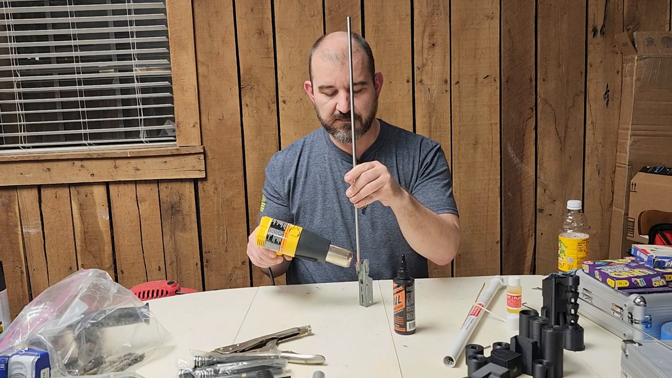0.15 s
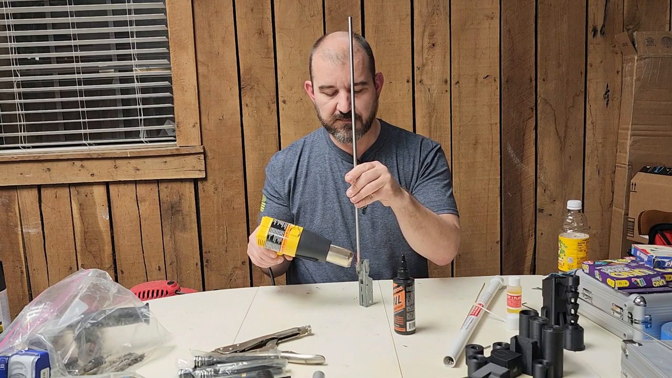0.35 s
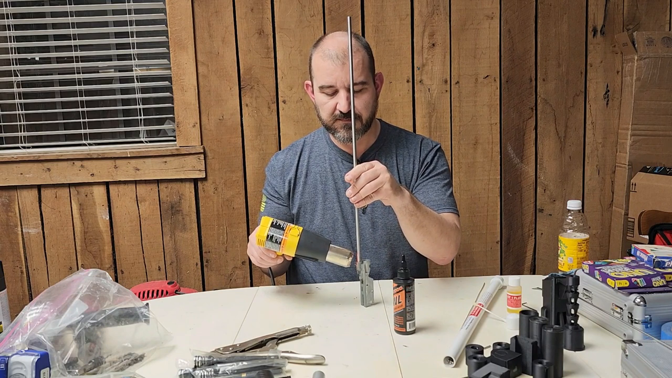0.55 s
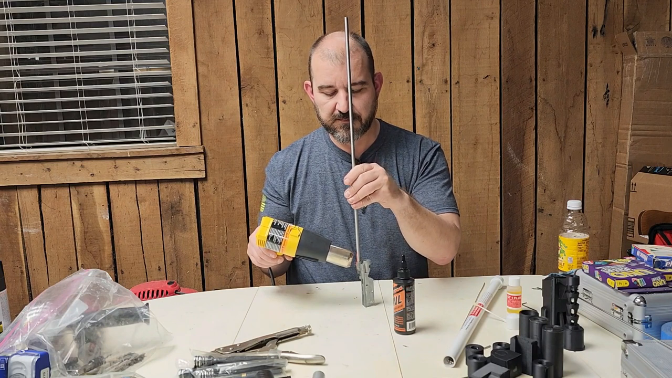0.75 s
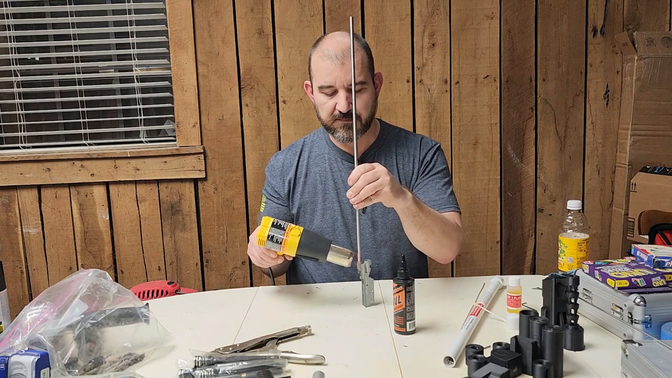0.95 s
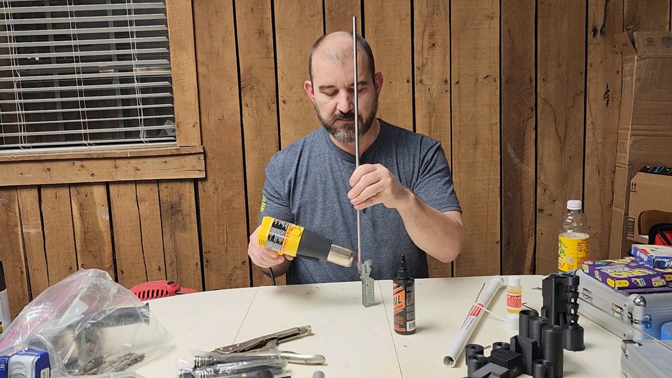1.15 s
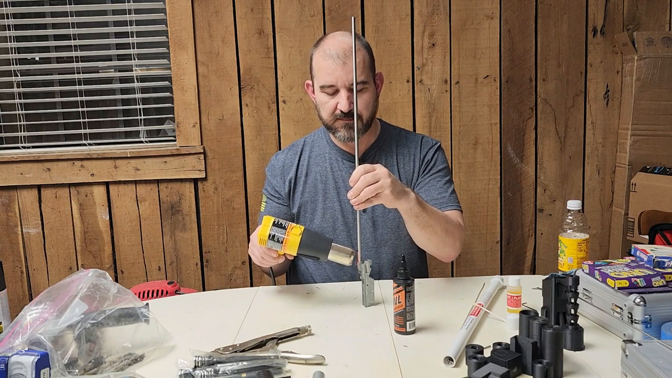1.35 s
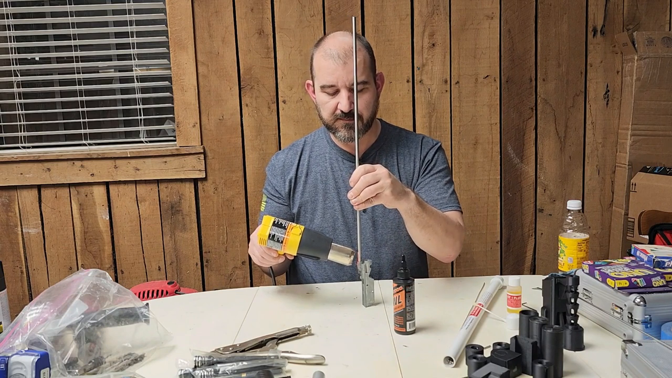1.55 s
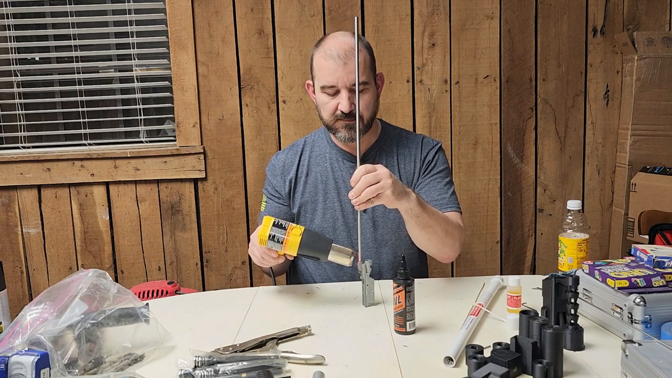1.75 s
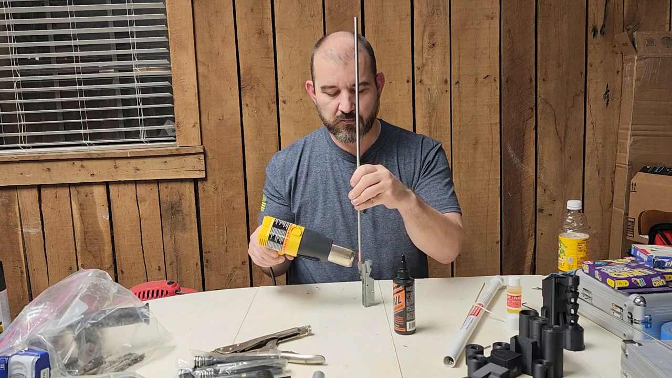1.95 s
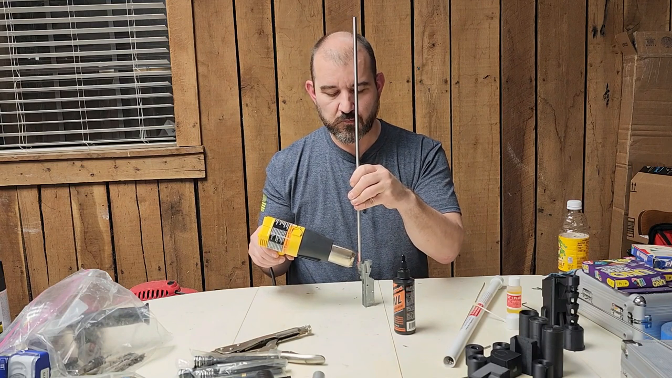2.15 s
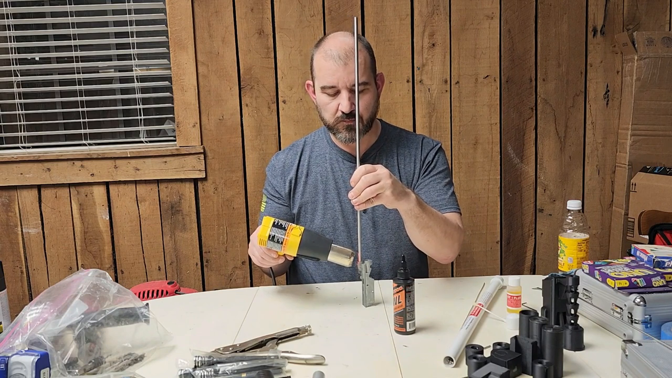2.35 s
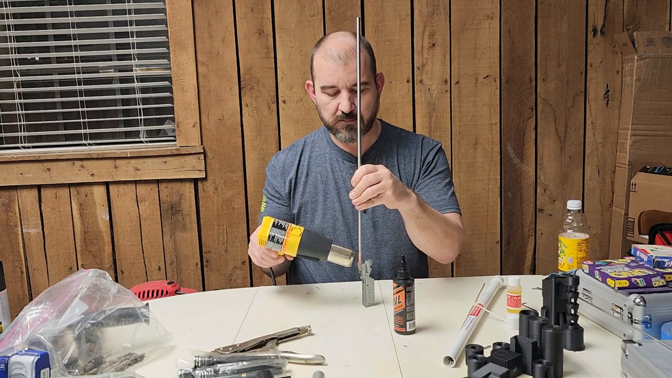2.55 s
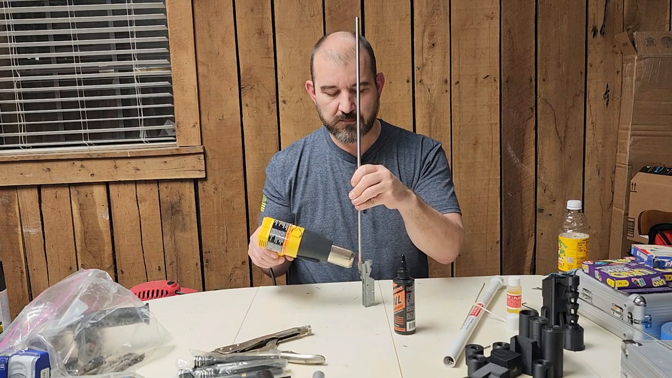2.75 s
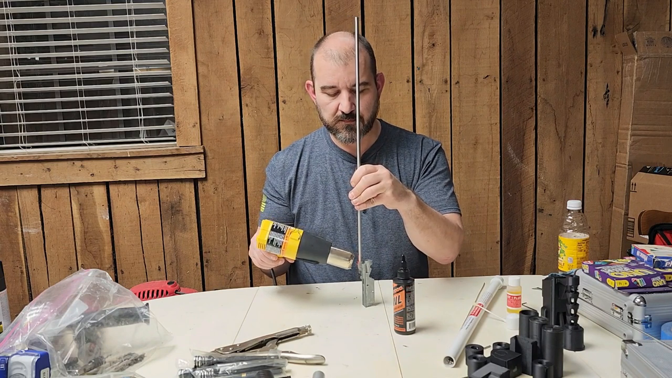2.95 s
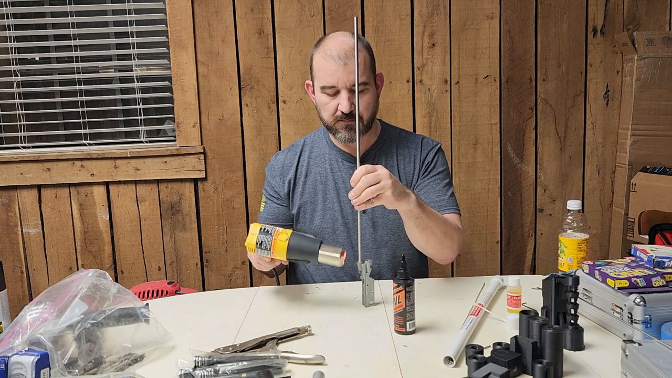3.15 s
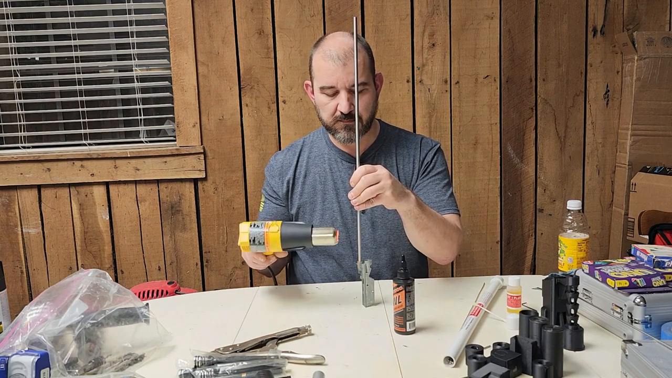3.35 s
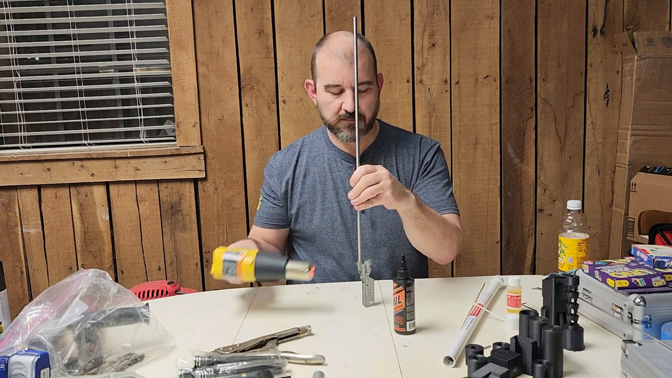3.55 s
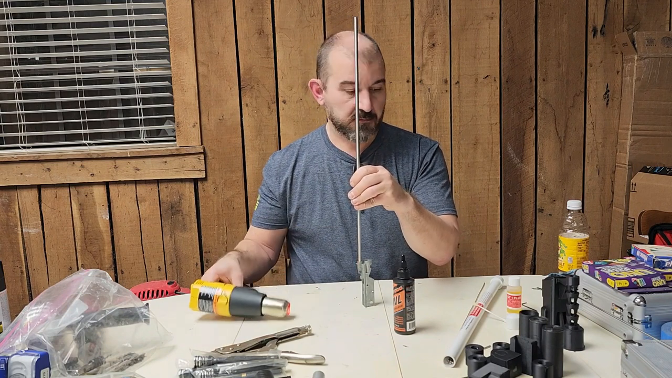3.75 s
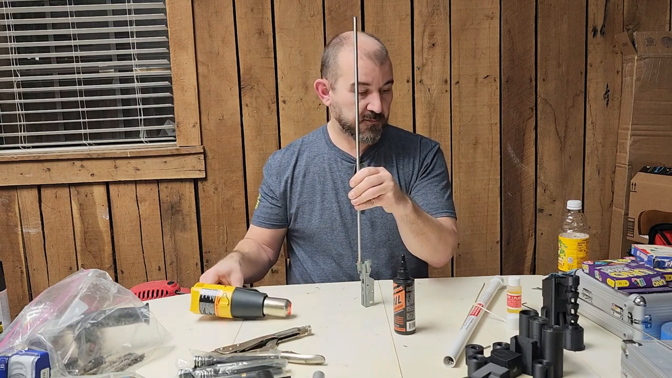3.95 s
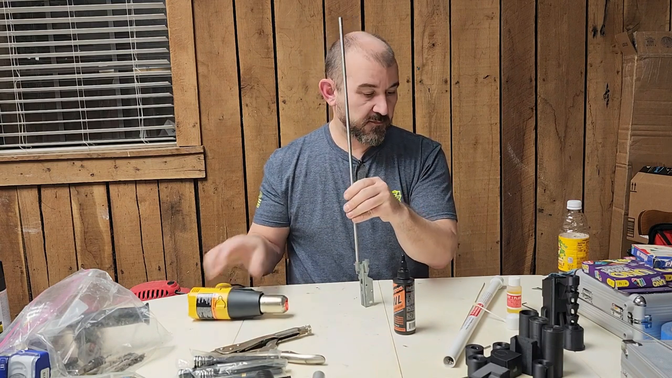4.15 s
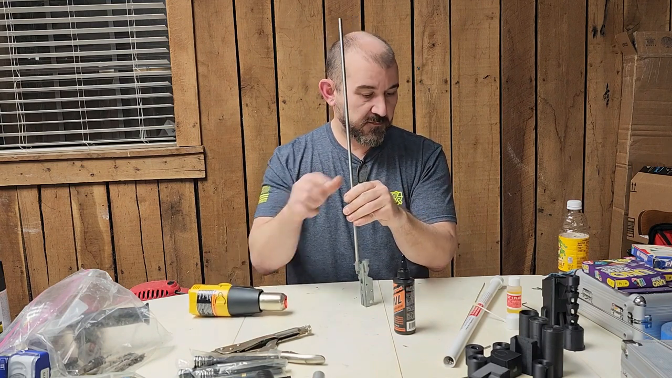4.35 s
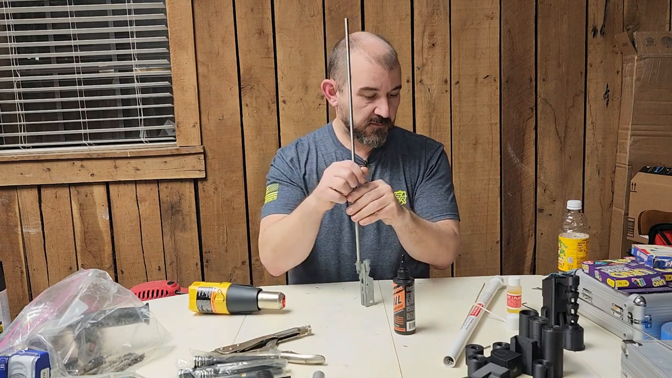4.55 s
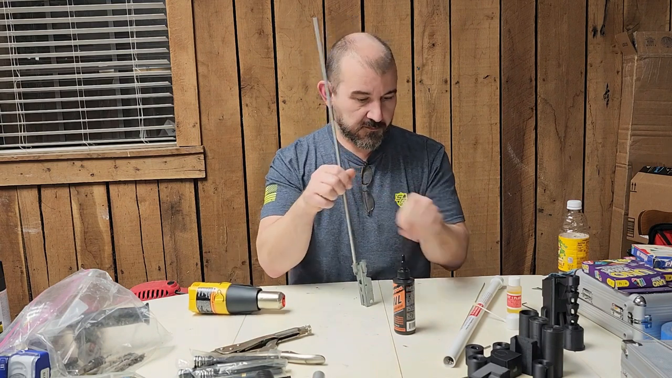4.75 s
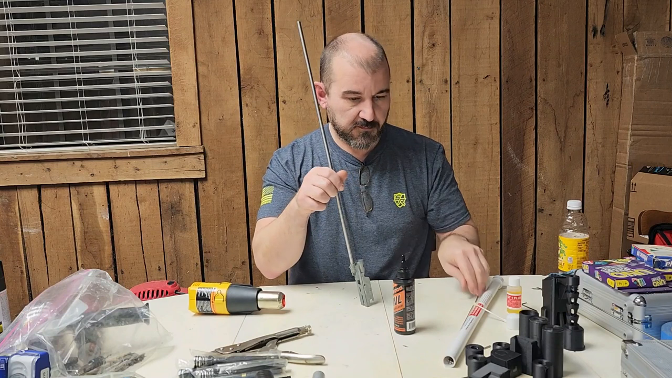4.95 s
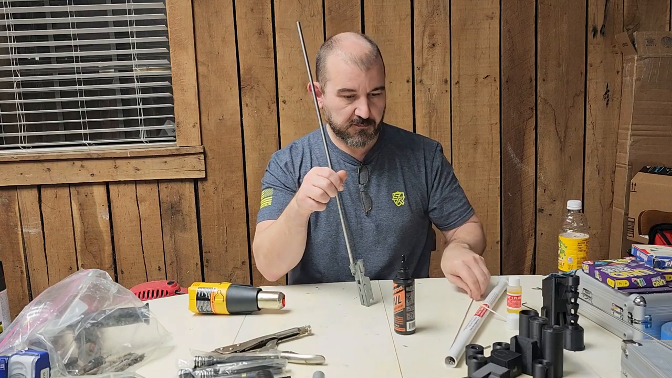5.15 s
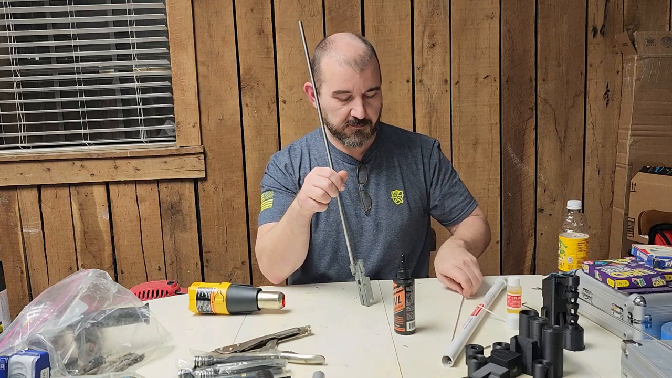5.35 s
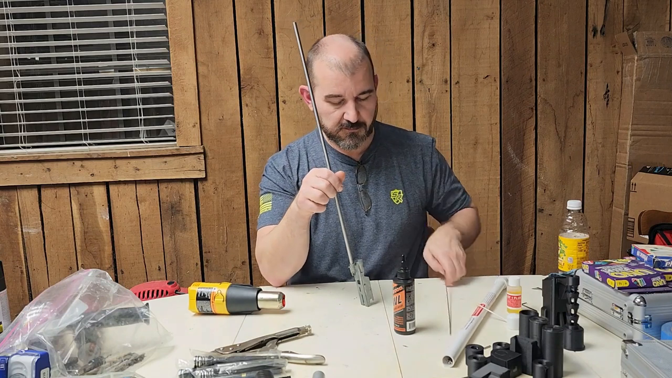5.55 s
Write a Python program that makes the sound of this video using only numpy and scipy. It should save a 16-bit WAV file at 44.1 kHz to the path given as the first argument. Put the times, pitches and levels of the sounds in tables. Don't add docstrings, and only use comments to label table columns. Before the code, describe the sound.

In a small wood-panelled room, a heat gun blows steadily, its whining motor mixed with rushing air. After about three seconds a switch snaps, the whine dies almost at once and the air fades. The gun hits a plastic table with two loud hollow knocks, rocks and settles, then hands rub and rustle softly over a low appliance hum. Stereo microphone, fairly close, with a short room ring.

```python
import sys
import numpy as np
from scipy import signal
from scipy.fft import rfft, irfft, next_fast_len
from scipy.io import wavfile

SR = 44100
rng = np.random.default_rng(int(sys.argv[2]) if len(sys.argv) > 2 else 0)


def to_linear_factor(level_db):
    exponent = np.asarray(level_db, float) / 20
    return 10 ** exponent


def wav_out(sig):
    wavfile.write(sys.argv[1], SR, np.round(np.clip(np.atleast_2d(sig).T, -1, 1) * 32767).astype(np.int16))


N = 247401
T = np.arange(N) / SR


def rms_one(x):
    return x / np.sqrt(np.mean(x ** 2) + 1e-20)


def at_hz(points, hz):
    table_hz, value = np.array(points)[:, 0], np.array(points)[:, 1]
    return np.interp(np.log(hz + 1), np.log(table_hz), value)


def drift(rate_hz):
    return np.interp(T * min(rate_hz, 70), np.arange(400), rng.standard_normal(400))


def stereo_noise(spectrum, likeness, size=N):
    pad = next_fast_len(size)
    hz = np.arange(pad // 2 + 1) * SR / pad
    mid, side = rfft(rng.standard_normal((2, pad)))
    alike = np.clip(at_hz(likeness, hz), -1, 1)
    pair = np.sqrt(1 + alike) * mid + np.sqrt(1 - alike) * side * [[1], [-1]]
    return rms_one(irfft(pair * to_linear_factor(at_hz(spectrum, hz)), pad)[:, :size])


def ring(push, hz, t60):
    radius = to_linear_factor(-60 / (t60 * SR))
    angle = 2 * np.pi * hz / SR
    return signal.lfilter([0, np.sin(angle)], [1, -2 * radius * np.cos(angle), radius * radius], push)


def add(track, s, sound):
    i = round(s * SR)
    track[i:i + len(sound)] += sound[:N - i]


# (frequency [Hz], likeness [-1 to 1])
DIRECT_LIKENESS = [(60, 0.82), (130, 0.87), (290, 1), (640, 0.93), (1410, 0.33), (3100, 0.54),
                   (6820, -0.21), (15000, -0.2)]


def shaft_tone(phase_turns, hz, level_db):
    apart = np.arccos(np.clip(at_hz(DIRECT_LIKENESS, hz), -.3, 1)) / 2
    angle = 2 * np.pi * (phase_turns + rng.random())
    pair = np.sin(angle + apart * np.array([[1], [-1]])) / np.cos(apart)
    return np.sqrt(2) * to_linear_factor(level_db + 1.0 * drift(15)) * pair


# (multiple of turn rate [-], level [dB])
SHAFT_ORDERS = [(1, -45), (2, -46), (4, -64), (6, -51), (7, -53), (8, -53), (9, -58), (10, -53), (13, -61),
                (14, -65), (15, -64), (17, -59), (18, -61), (19, -68), (20, -62), (21, -65), (22, -63),
                (23, -71), (24, -63)]
# (multiple of turn rate [-], shift [ripples], level [dB])
RIPPLE_TONES = [(6, 1, -59), (10, -1, -65), (11, -1, -56), (17, -1, -62), (20, 1, -69), (30, 1, -70),
                (33, 1, -72)]
# (multiple of turn rate [-], level at the work [dB], level swung away [dB], wander [dB])
BEAMED_TONES = [(3, -45, -64, 1), (11, -47, -57, 1), (12, -63, -47, 4), (16, -61, -51, 3)]
# (time [s], turn rate [Hz])
SHAFT_SPEED = [(0, 235.3), (2.1, 235.3), (2.45, 235.6), (2.85, 236.0), (3.27, 235.6)]


def motor():
    wander_db, ripple_hz = 1.7, 120
    off_s, coast_s, tone_fade_s = 3.262, .7, .05
    after = np.maximum(T - off_s, 0)
    speed = np.interp(T, *np.transpose(SHAFT_SPEED)) + 0.298 * drift(8.6)
    turns = np.cumsum(speed * np.exp(-after / coast_s)) / SR

    swing_out = (T - 2.92) / 0.29
    swing_back = 1 - (T - 3.225) / 0.051
    swing = np.clip(np.minimum(swing_out, swing_back), 0, 1)
    out = np.zeros((2, N))
    for multiple, work_db, away_db, own_db in BEAMED_TONES:
        level_db = work_db + swing * (away_db - work_db) + (1 - swing) * own_db * drift(4.0)
        out += shaft_tone(multiple * turns, 235 * multiple, level_db)

    plain = [(k, 0, level_db) for k, level_db in SHAFT_ORDERS]
    upper = [(k, 0, -70 - .4 * (k - 25)) for k in range(25, 37)]
    for multiple, shift, level_db in plain + upper + RIPPLE_TONES:
        phase = multiple * turns + shift * ripple_hz * T
        out += shaft_tone(phase, 235 * multiple, level_db + wander_db * drift(2.8))
    return out * np.exp(-after / tone_fade_s)


# (frequency [Hz], level [dB per Hz])
AIR_COLOUR = [(120, -28), (250, -15.5), (400, -11), (600, -1.5), (880, -5), (1080, -9), (1400, -4.5),
              (1900, -9.5), (2250, -10), (2600, -8.5), (3000, -13.5), (4000, -14), (5000, -20.5),
              (16000, -27.5)]


def air():
    stream_db, treble_db = -37, 3
    stall_s, stall_db, stall_time_s = 3.36, -7, 0.046
    rundown_db_per_s, dulling_db, stop_s = 27.5, -8, 3.75
    after = np.maximum(T - stall_s, 0)
    stalled = 1 - np.exp(-after / stall_time_s)
    level_db = stream_db + stall_db * stalled - rundown_db_per_s * after
    level_db = level_db - 90 * np.maximum(T - stop_s, 0)
    noise = stereo_noise(AIR_COLOUR, DIRECT_LIKENESS)
    bass = signal.sosfiltfilt(signal.butter(2, 4500, fs=SR, output="sos"), noise)
    treble = to_linear_factor(treble_db + dulling_db * stalled) * (noise - bass)
    return to_linear_factor(level_db + 1.0 * drift(7.85)) * (bass + treble)


# (left delay [s], right delay [s], level [dB])
NEAR_ECHOES = [(.0021, .0024, -12), (.0047, .0043, -11), (.0083, .0089, -11), (.0131, .0122, -12)]


def near_echoes(x):
    out = x.copy()
    dull = signal.sosfilt(signal.butter(1, 5000, fs=SR, output="sos"), x)
    for *lags_s, level_db in NEAR_ECHOES:
        for side, lag_s in enumerate(lags_s):
            lag = round(lag_s * SR)
            out[side, lag:] += to_linear_factor(level_db) * dull[side, :-lag]
    return out


def plastic_snaps(rows, t60):
    out, t = np.zeros(N), np.arange(2000) / SR
    for s, peak_db, hz in rows:
        burst = rng.standard_normal(2000) * to_linear_factor(-60 * t / t60)
        edges_hz = [hz / 6.1, min(hz * 1.1, .45 * SR)]
        snap = signal.sosfilt(signal.butter(1, edges_hz, "band", fs=SR, output="sos"), burst)
        add(out, s, to_linear_factor(peak_db) * snap / np.max(np.abs(snap)))
    return out


# (time [s], peak level [dB], top frequency of the band [Hz])
SWITCH_SNAPS = [(3.2064, -35, 11000), (3.222, -42, 9200), (3.243, -45, 8700), (3.259, -22, 9100),
                (3.272, -40, 11600), (3.333, -30, 11000), (3.3436, -25, 7000)]


def switch():
    return plastic_snaps(SWITCH_SNAPS, t60=.015)


# (time [s], peak level [dB], nose 0 to handle 1 [-], contact cut-
# off [Hz])
CONTACTS = [(3.259, -33, 0.38, 3000), (3.342, -34, 0.22, 2390), (3.62, -27, 0.65, 1700),
            (3.628, -32, 0.39, 1716), (3.809, -5, 0.36, 2750), (3.817, -40.5, 0.81, 302),
            (3.865, -25, 0.28, 1494), (3.9588, -3.5, 0.99, 3050), (3.9619, -5.5, 0.95, 2540),
            (4.013, -23, 0.97, 795), (4.07, -18, 0.33, 399), (4.117, -22.5, 0.52, 600),
            (4.134, -37, 0, 600), (4.175, -26.5, 0.89, 625), (4.206, -43, 0.85, 1800),
            (4.222, -35, 0.19, 547), (4.355, -32.5, 0.4, 505), (4.403, -35, 0.64, 497),
            (4.498, -29, 0.14, 550), (4.52, -35, 0, 600), (5.052, -40, 0.83, 800), (5.152, -40, 0.75, 1990),
            (5.39, -44.5, 0.075, 1500)]
# (frequency [Hz], nose level [dB], handle level [dB], t60 [s])
BODY_MODES = [(139.8, -2, -17, 0.13), (204, -11, -12.5, 0.072), (310.6, -10, -11, 0.082),
              (362, -5.5, -5.5, 0.049), (448, -7.5, -2.5, 0.033), (600, -4, -5.5, 0.051),
              (766, -7.5, -1, 0.019), (880, -11, -7.5, 0.049), (1090, -25, -8, 0.036),
              (1378, 2, -7.5, 0.036), (1596, -3, 0.5, 0.026), (1890, -17.5, -5, 0.037),
              (2150, -28.5, -22, 0.028), (2920, -26.5, -25.5, 0.01)]
# (frequency [Hz], level [dB per Hz])
CRACK_COLOUR = [(300, -13), (1000, 11), (2000, 7.5), (3500, -2), (5000, -9.5), (8000, -13), (16000, -22.5)]


def knocks():
    out, t = np.zeros(N), np.arange(9000) / SR
    for s, peak_db, end, cut_hz in CONTACTS:
        scuff = rng.standard_normal(9000) * np.exp(-t * cut_hz / 5.7)
        scuff = 0.065 * min(1500 / cut_hz, 1.4) * scuff
        push = signal.sosfilt(signal.butter(3, cut_hz * 1.36, fs=SR, output="sos"), (t == 0) + scuff)
        chance_db = rng.normal(0, 1.0, len(BODY_MODES))
        body = np.zeros(9000)
        for k, (hz, nose_db, handle_db, t60) in enumerate(BODY_MODES):
            level_db = nose_db + end * (handle_db - nose_db) + chance_db[k]
            body += (-1) ** k * to_linear_factor(level_db) * ring(push, hz, t60)
        dying = to_linear_factor(-60 * t / 0.043) + to_linear_factor(-6.5 - 60 * t / 0.21)
        crack = stereo_noise(CRACK_COLOUR, DIRECT_LIKENESS, size=9000)[0] * dying
        crack = to_linear_factor(-19) * crack * (cut_hz / 2500) ** 2
        add(out, s, to_linear_factor(peak_db) * (body / np.max(np.abs(body)) + crack))
    return out


# (time [s], peak level [dB], top frequency of the band [Hz])
SETTLING_TICKS = [(4.3094, -53, 7760), (4.359, -53.5, 7700), (4.496, -48.5, 5170), (5.0875, -59, 5560)]


def ticks():
    return plastic_snaps(SETTLING_TICKS, t60=0.028)


def strokes(rows, rest_db):
    power = np.full(N, to_linear_factor(rest_db) ** 2)
    for s, rise_s, peak_db in rows:
        age = np.maximum(T - s, 0) / max(rise_s, .005)
        power += (to_linear_factor(peak_db) * age ** 1.27 * np.exp(1.48 * (1 - age))) ** 2
    return np.sqrt(power)


# (frequency [Hz], likeness [-1 to 1])
SCATTERED_LIKENESS = [(60, 1), (130, 0.83), (290, 0.76), (640, 0.27), (1410, -0.43), (3100, 0.14),
                      (6820, 0.29), (15000, 0.34)]
# (start [s], rise [s], peak level [dB])
RUB_STROKES = [(3.42, 0.088, -58), (3.6, 0.03, -42), (3.85, 0.14, -45.5), (4.04, 0.045, -40),
               (4.24, 0.063, -54), (4.36, 0.085, -56.5), (4.46, 0.047, -58), (4.64, 0.05, -62),
               (5.0, .05, -65), (5.145, 0.039, -45), (5.37, 0.051, -53.5), (5.5, 0.087, -58)]
# (start [s], rise [s], peak level [dB])
RUSTLE_STROKES = [(3.85, .1, -66), (4.03, 0.088, -63), (4.28, 0.05, -78), (4.34, .03, -67),
                  (4.47, .03, -78), (4.6, .05, -80), (5.06, 0.034, -63), (5.16, 0.028, -73),
                  (5.32, 0.027, -75), (5.5, 0.067, -86)]
# (start [s], rise [s], peak level [dB])
ROD_STROKES = [(3.4, 0.085, -66.5), (3.7, 0.16, -70), (4.04, 0.07, -67), (4.24, 0.075, -73),
               (4.4, .04, -75), (4.6, 0.032, -78), (5.05, .06, -78.5), (5.32, 0.036, -85),
               (5.5, 0.069, -79)]
# (frequency [Hz], level [dB per Hz])
RUB_COLOUR = [(300, -15), (600, -4.5), (1300, -1), (2500, -12.5), (4000, -19), (6500, -28), (9000, -33.5),
              (12000, -48.5)]
# (frequency [Hz], level [dB per Hz])
RUSTLE_COLOUR = [(3000, -34), (5000, -8.5), (8000, -6.5), (12000, -6.5), (16000, -5.5)]
# (frequency [Hz], width [Hz], level [dB])
ROD_MODES = [(1170, 40, -6.5), (3180, 60, 1), (5160, 100, -8), (6500, 100, -15.5), (7250, 120, -6),
             (7400, 120, -7.5), (7700, 250, 0), (11400, 300, -11.5)]


def hands():
    rub = strokes(RUB_STROKES, rest_db=-64.5) * to_linear_factor(2.0 * drift(30))
    rub = rub * stereo_noise(RUB_COLOUR, SCATTERED_LIKENESS)
    rustle = strokes(RUSTLE_STROKES, rest_db=-105) * to_linear_factor(2.1 * drift(60))
    rustle = rustle * stereo_noise(RUSTLE_COLOUR, SCATTERED_LIKENESS)
    squeak = np.zeros((2, N))
    for hz, width_hz, level_db in ROD_MODES:
        ringing = rms_one(ring(rng.standard_normal((2, N)), hz, 2.6 / width_hz))
        squeak += to_linear_factor(level_db + 2.6 * drift(14)) * ringing
    return rub + rustle + strokes(ROD_STROKES, rest_db=-94.5) * squeak


# (frequency [Hz], t60 [s])
ROOM_DECAY = [(150, 0.36), (600, 0.24), (2500, 0.23), (9000, 0.21)]


def room(x):
    size = SR // 2
    t, tail = np.arange(size) / SR, np.zeros((2, size))
    noise = stereo_noise([(20, 0), (20000, 0)], SCATTERED_LIKENESS, size=size)
    for hz in 90 * 2. ** np.arange(8):
        edges_hz = [hz / 2 ** .5, hz * 2 ** .5]
        band = signal.sosfilt(signal.butter(2, edges_hz, "band", fs=SR, output="sos"), noise)
        tail += band * to_linear_factor(-60 * t / at_hz(ROOM_DECAY, hz))
    tail = tail * np.clip((t - .003) / 0.0038, 0, 1)
    tail = tail / np.sqrt(np.sum(tail ** 2) / 2)
    return signal.fftconvolve(x[None], tail, axes=1)[:, :N]


# (frequency [Hz], level [dB])
HUM_TONES = [(120, -37), (148.6, -59), (181, -60.5), (240, -54.5), (268.6, -57.5), (360, -54.5),
             (600, -68.5)]
# (frequency [Hz], level [dB per Hz])
RUMBLE_COLOUR = [(20, -33.5), (35, -10.5), (55, -3), (100, 5), (135, 1), (200, -0.5), (280, -6.5),
                 (400, -17), (520, -17.5), (1000, -26), (2200, -30), (4000, -55.5), (8000, -61.5),
                 (16000, -59)]


def hum():
    tones = np.zeros(N)
    for hz, level_db in HUM_TONES:
        sine = np.sin(2 * np.pi * (hz * T + rng.random()))
        tones += np.sqrt(2) * to_linear_factor(level_db + 0.29 * drift(1.6)) * sine
    return tones + to_linear_factor(-41.5) * stereo_noise(RUMBLE_COLOUR, SCATTERED_LIKENESS)


def scene():
    tones, stream = motor(), air()
    hits = switch() + knocks() + ticks()
    spread = signal.sosfilt(signal.butter(1, 3000, fs=SR, output="sos"), stream[0])
    walls = room(to_linear_factor(-4.0) * hits + to_linear_factor(-9.5) * spread)
    return tones + to_linear_factor(-1.5) * near_echoes(stream) + hits + walls + hands() + hum()


def band_limit(x):
    return signal.sosfilt(signal.butter(12, 16460, fs=SR, output="sos"), x)


# (frequency [Hz], difference [dB])
PORT_DIFFERENCE = [(60, 1), (110, 1), (200, 1), (380, -1), (700, 0.5), (1290, 6.5), (2380, 3), (4400, 10.5),
                   (8120, 11.5), (15000, -11.5)]
# (frequency [Hz], level [dB])
MICROPHONE_COLOUR = [(20, -4), (5500, -2), (7600, -0.5), (8600, -3.5), (10000, -8), (12000, -0.5),
                     (14500, -5.5), (15800, -9), (16300, -42)]


def record(dry):
    pad = next_fast_len(N + 2048)
    hz = np.arange(pad // 2 + 1) * SR / pad
    tilt = to_linear_factor(at_hz(PORT_DIFFERENCE, hz) / 2)
    ports = np.array([tilt, 1 / tilt]) * 2 / (tilt + 1 / tilt)
    ports = ports * to_linear_factor(at_hz(MICROPHONE_COLOUR, hz))
    mix = irfft(rfft(dry, pad) * ports, pad)[:, :N]
    return band_limit(np.clip(mix, -.98, .98))


dry = scene()
out = record(dry)
wav_out(out)
```